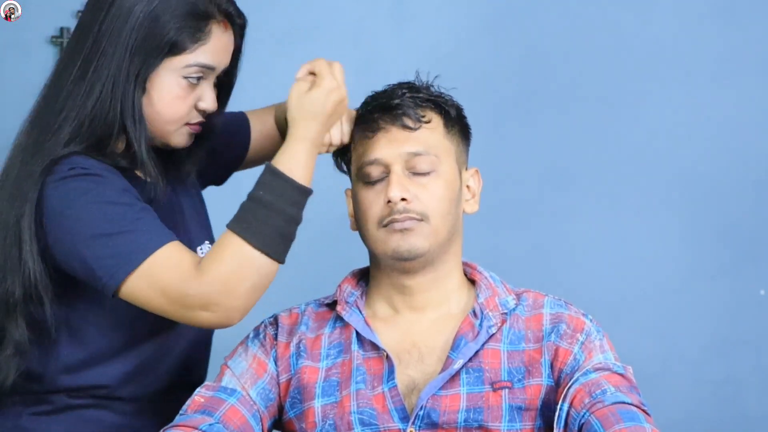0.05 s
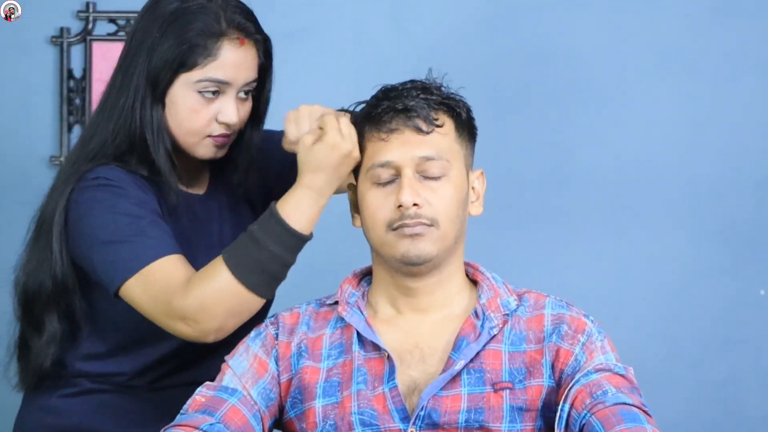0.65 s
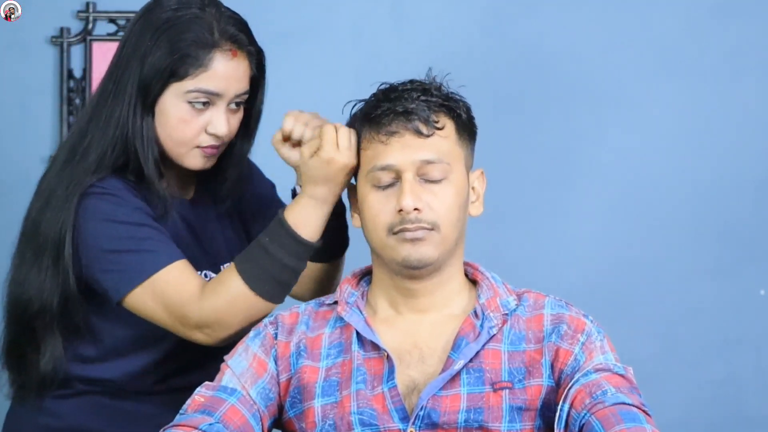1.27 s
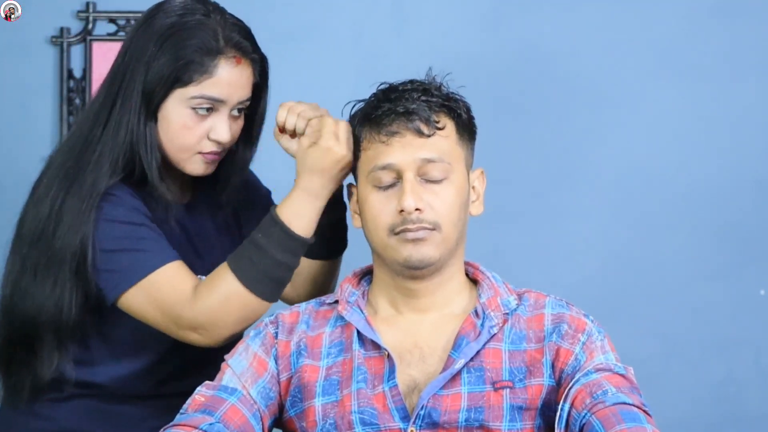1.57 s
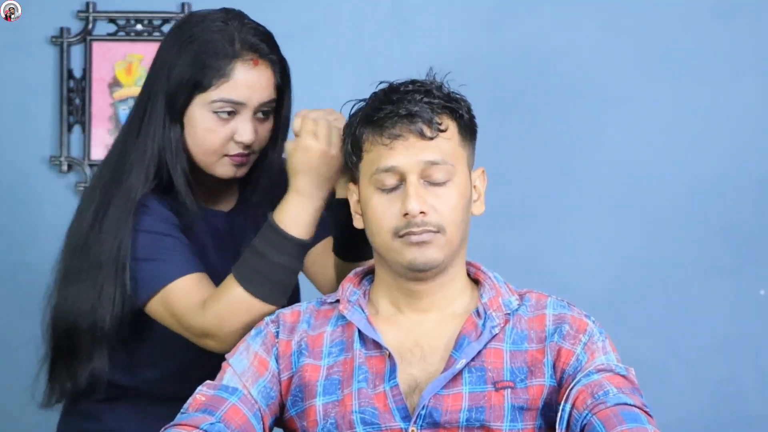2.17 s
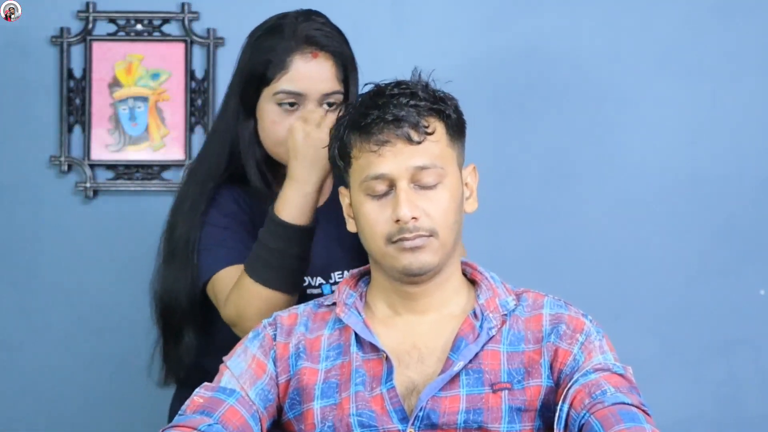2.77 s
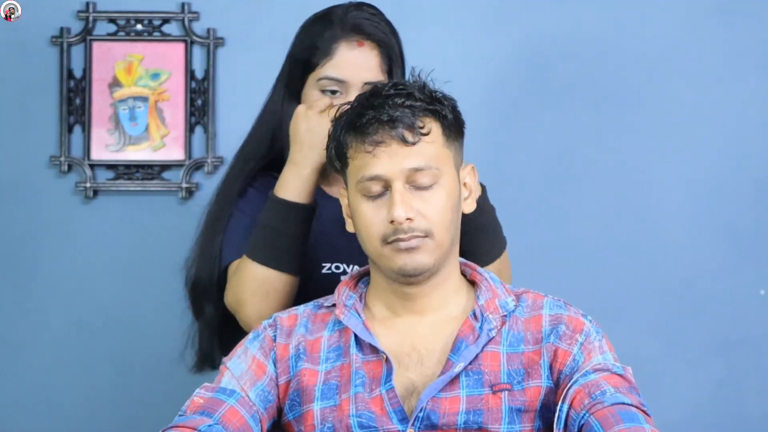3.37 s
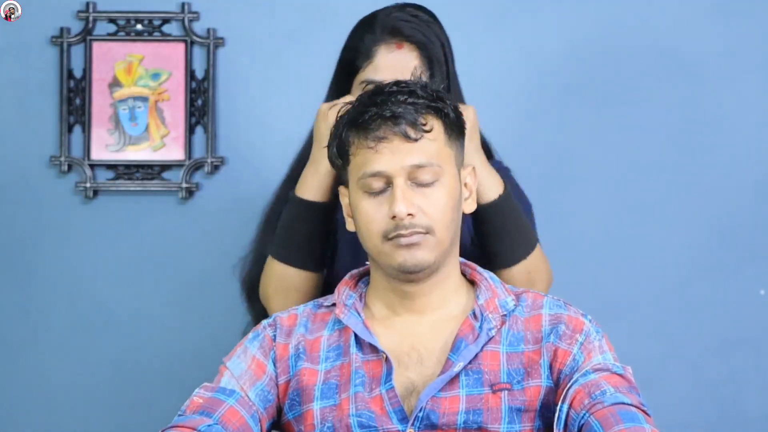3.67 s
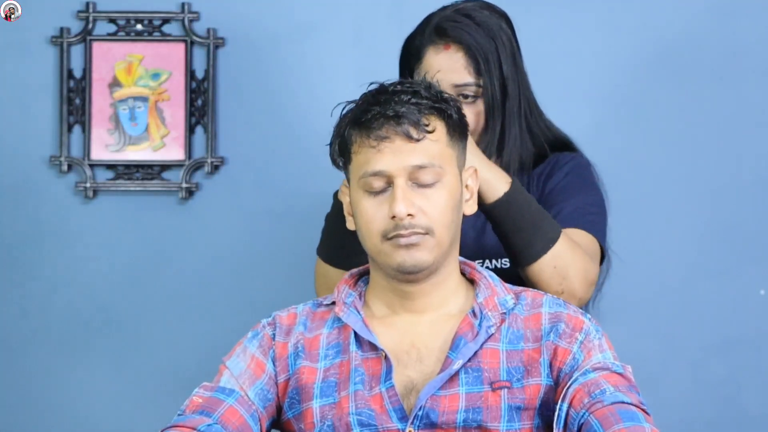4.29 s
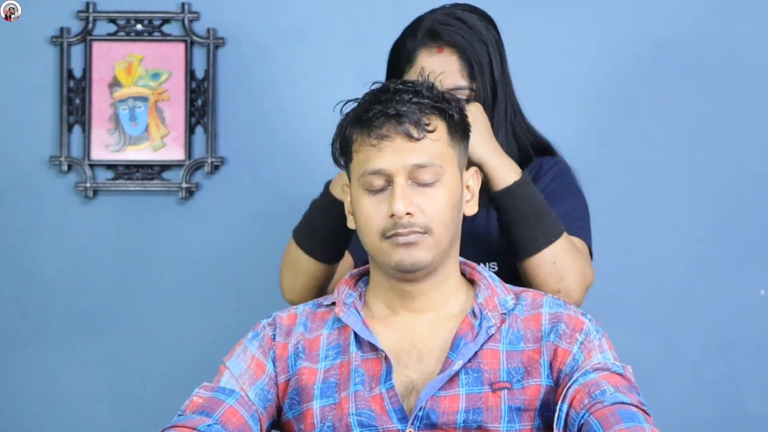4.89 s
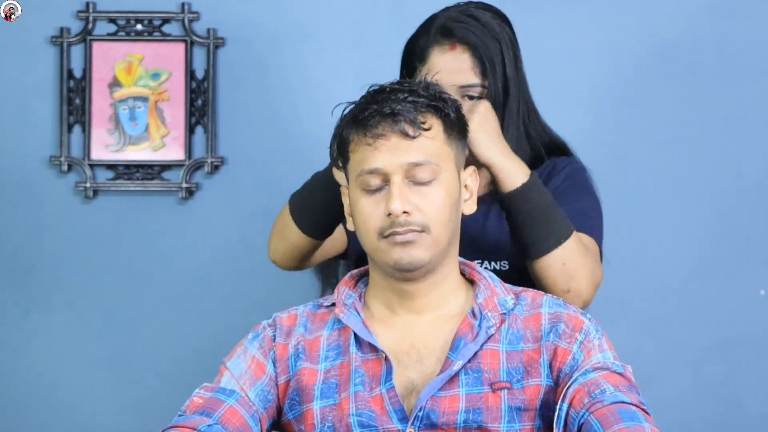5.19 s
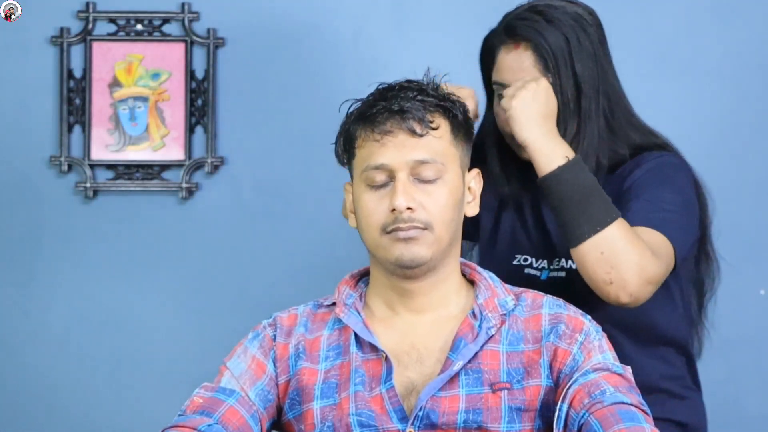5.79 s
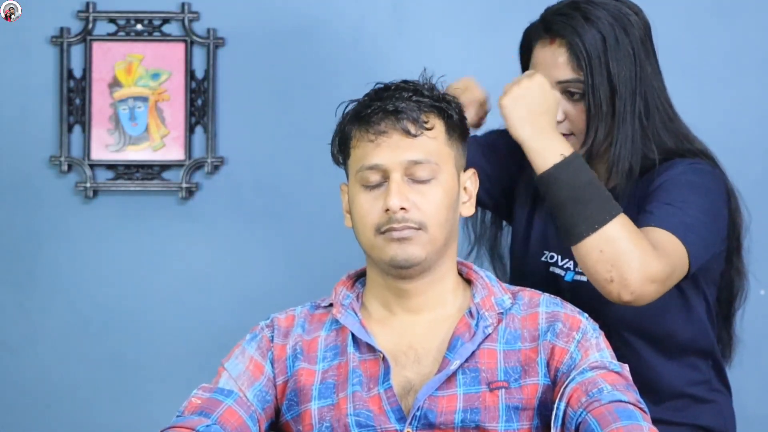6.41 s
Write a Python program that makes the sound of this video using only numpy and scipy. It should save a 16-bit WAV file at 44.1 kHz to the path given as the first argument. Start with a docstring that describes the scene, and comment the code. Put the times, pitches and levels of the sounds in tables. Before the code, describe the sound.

Locks of hair are twisted between two fists and tugged about three times a second, close to the microphones. Each tug gives a crisp, slightly creaky snap with a soft low thump from the scalp. Between tugs, fingers take a new grip with a thin rustle and tick. The snaps are loudest around the middle, then carry on more lightly. A small room hums faintly behind.

```python
"""Tugging locks of hair

Hair is twisted between two fists and tugged about three times a second, close to two microphones.
Each tug rubs strand on strand, lets go with a crisp snap and jolts the scalp with a soft thump.
Between tugs the fingers take a new grip with a thinner rustle. A small room hums quietly behind."""
import sys
import numpy as np
from scipy import signal
from scipy.fft import rfft, irfft
from scipy.io import wavfile
from scipy.ndimage import uniform_filter1d

SR = 44100
rng = np.random.default_rng(int(sys.argv[2]) if len(sys.argv) > 2 else 0)


def digitize_waveform(pressure):
    """Quantize a signal to 16-bit integers and store it at the path in sys.argv[1].

    Rows of a 2-D input are taken as channels; values are limited to [-1, 1].
    """
    field = np.atleast_2d(pressure).T
    bounded = np.clip(field, -1, 1)
    quanta = np.round(bounded * 32767).astype(np.int16)
    wavfile.write(sys.argv[1], SR, quanta)


N = 293265
SIZE, LEAD = 8192, 2048  # samples in one short sound, and how many come before its time zero
T = (np.arange(SIZE) - LEAD) / SR
HZ = np.fft.rfftfreq(SIZE, 1 / SR)


def amp(db):
    """Turns decibels into a gain."""
    return 10 ** (np.asarray(db) / 20)


def unit_rms(x):
    """Scales a signal to an average strength (rms) of 1."""
    return x / np.sqrt(np.mean(x ** 2) + 1e-20)


def curve(points, hz):
    """Joins the points of a table along a logarithmic pitch axis."""
    f, value = np.transpose(points)
    return np.interp(np.log(hz + 1e-6), np.log(f), value)


def colour(x, db):
    """Shapes the tone with a filter that rings after each click, never before."""
    phase = -signal.hilbert(np.log(amp(np.r_[db, db[-2:0:-1]]))).imag[:len(db)]
    return irfft(rfft(x) * amp(db) * np.exp(1j * phase))


def add(mix, s, sound):
    """Lays a sound into the mix with its time zero at s seconds."""
    start = round(s * SR) - LEAD
    sound = sound[:, max(-start, 0):]
    part = mix[:, max(start, 0):][:, :sound.shape[1]]
    part += sound[:, :part.shape[1]]


def place(x, late_ms, balance_db):
    """Makes the left side later and louder than the right; negative values do the opposite."""
    half = np.array([[.5], [-.5]])
    delay = half * late_ms / 1000
    return irfft(rfft(x) * np.exp(-2j * np.pi * HZ * delay)) * amp(half * balance_db)


def wander(count, size):
    """A smooth random curve that changes over about size steps."""
    return unit_rms(uniform_filter1d(uniform_filter1d(rng.standard_normal(count), size), size))


def swell(rise, fall, centre=0.):
    """Grows to a peak at centre, then dies away; times in seconds."""
    return np.exp(np.minimum((T - centre) / rise, (centre - T) / fall))


def grains(tone_db, per_s, spread_db, apart):
    """Tiny slips of uneven size; apart weights those that reach only one microphone."""
    sizes = amp(spread_db * np.minimum(rng.exponential(1, (3, SIZE)), 4))
    slips = sizes * rng.choice([-1, 1], (3, SIZE)) * (rng.random((3, SIZE)) < per_s / SR)
    slips *= amp(1.8 * wander(SIZE, size=170))  # strands catch and give in clumps
    hollows_db = 3 * wander(len(HZ), size=70)  # each grip forms hollows with their own tone
    fizz = unit_rms(colour(slips, tone_db + hollows_db))
    return unit_rms(fizz[0] + apart * fizz[1:])


def burst(tone_db, fall, span, early):
    """One sudden slip amid a rush of small ones, with the energy of span seconds at rms 1."""
    slips = rng.standard_normal(SIZE) * swell(rise=fall / 2, fall=fall, centre=fall / 2)
    click = unit_rms(colour(1. * (T == 0), tone_db))
    rush = unit_rms(colour(slips, tone_db))
    x = np.roll(click + .5 * rush, -round(early * SR))
    return x / np.linalg.norm(x) * np.sqrt(span * SR)


def low_cut(lowest_hz):
    """A tight lock gives off little sound below its lowest note: that loss in dB."""
    return -19.5 * np.clip((1.03 - HZ / lowest_hz) / 0.13, 0, 1)


# Tone of the room's hum: f/Hz, relative level/dB
HUM_TONE = [(20, -25.5), (50, -19), (100, -14), (160, 6.5), (215, -2.5), (270, 6), (315, -2.5), (400, -0.5),
            (600, -8), (900, -10.5), (1250, -10.5), (1600, -19.5), (2500, -23.5), (4500, -36),
            (9000, -41.5), (15000, -49)]
# How alike its two sides are: f/Hz, likeness (1 = the same)
HUM_LIKENESS = [(50, 0.91), (250, 1), (500, 0.83), (1200, 0.06), (4000, 0.066), (14000, .2)]
# Which way it leans: f/Hz, left minus right/dB
HUM_LEAN = [(60, 3), (130, 0.5), (290, -1.5), (640, -3), (1410, -4.5), (3100, -3.5), (6820, -2.5),
            (15000, -1)]


def hum(level_db=-55):
    """The room's low, airy background, drifting a little in level from pitch to pitch."""
    hz = np.fft.rfftfreq(2048, 1 / SR)
    a, b, c, d, drift = rng.standard_normal((N // 512 + 5, len(hz), 5)).T
    drift = unit_rms(uniform_filter1d(uniform_filter1d(drift, size=9, axis=0), size=14, axis=1))
    likeness = np.clip(curve(HUM_LIKENESS, hz), -1, 1)[:, None]
    left = a + 1j * b
    right = likeness * left + np.sqrt(1 - likeness ** 2) * (c + 1j * d)
    bands = np.array([left, right]) * amp(curve(HUM_TONE, hz)[:, None] + 1.5 * drift)
    bands *= amp(np.outer([.5, -.5], curve(HUM_LEAN, hz)))[:, :, None]
    return amp(level_db) * unit_rms(signal.istft(bands, nperseg=2048, noverlap=1536)[1][:, :N])


# Tone of a creaking lock: f/Hz, relative level/dB
CREAK_TONE = [(200, 11), (500, 2), (800, -6.5), (1400, -5.5), (2400, -9), (3200, -7.5), (4200, -7.5),
              (5500, -15.5), (12000, -38.5)]


def creak(snap_db, rub_db, lowest_hz):
    """The tight lock creaks: more with a harder snap, but only as far as friction allows."""
    tension = 1 / np.hypot(amp(-snap_db + 3.5), amp(-rub_db - 2.5))
    slips = grains(curve(CREAK_TONE, HZ) + low_cut(lowest_hz), per_s=2800, spread_db=1.5, apart=1)
    peak = swell(rise=.004, fall=.0068, centre=.00056)
    return tension * slips * (peak + amp(-13.5) * swell(rise=.024, fall=.04))


# Tone of hair sliding on hair: f/Hz, relative level/dB
RUB_TONE = [(200, -34.5), (1500, -26), (2600, -4), (3600, -13), (5000, 2), (7000, 2), (9500, -1.5),
            (12500, -1.5), (15000, -8.5)]


def friction(rub_db, rustle_db):
    """Strands rub hardest as the lock lets go, and a longer rustle trails off."""
    tone_db = curve(RUB_TONE, HZ)
    width = np.where(T < .001, .0045, .008)
    release = np.exp(-((T - .001) / width) ** 2)
    build_up = amp(-10.5) * swell(rise=.015, fall=.004, centre=.0014)
    rub = amp(rub_db - 2.5) * grains(tone_db, per_s=7000, spread_db=5, apart=.8)
    rustle = amp(rustle_db + 7.5) * grains(tone_db, per_s=4000, spread_db=4.5, apart=2)
    return rub * (release + build_up) + rustle * swell(rise=.011, fall=.025, centre=.0044)


# Tone of a snap: multiple of the snap's pitch, relative level/dB
SNAP_TONE = [(.1, -1), (.3, -15.5), (.5, -7), (.65, -12.5), (.85, 3.5), (1.22, -3.5), (1.5, 0),
             (1.85, -13.5), (3.2, -33.5), (5.5, -26)]


def snap(db, hz, lowest_hz):
    """The twisted lock lets go all at once."""
    tone_db = curve(SNAP_TONE, HZ / hz) + low_cut(lowest_hz)
    return amp(db) * burst(tone_db, fall=.0012, span=.0019, early=.0003)


# Tone of a tick: f/Hz, relative level/dB
TICK_TONE = [(300, -36), (2500, -25), (4500, -22), (6500, -5), (11000, 9.5), (15500, 2.5)]


def tick(db):
    """Single hairs give a dry, bright click."""
    return amp(db) * burst(curve(TICK_TONE, HZ), fall=.0006, span=.0018, early=.0002)


def stroke(snap_db, snap_hz, lowest_hz, tick_db, rub_db, rustle_db):
    """One pull on the hair: it snaps, ticks, creaks and rubs."""
    x = snap(snap_db, snap_hz, lowest_hz) + tick(tick_db)
    x = x + creak(snap_db, rub_db, lowest_hz) + friction(rub_db, rustle_db)
    return x * signal.windows.tukey(SIZE, .2)


def thump(db, hz):
    """The scalp is moved, springs back once and shudders to rest."""
    width = np.where(T < 0, .58, .68) / hz
    swing_hz = hz * np.where(T < 0, .96, .88)  # the swing slows as the skin relaxes
    push = np.cos(2 * np.pi * swing_hz * T) * np.exp(-(T / width) ** 2)
    flesh_db = curve([(25, -25), (70, 5), (140, 2.5), (220, -7), (400, -33), (900, -37), (3000, -71)], HZ)
    noise = unit_rms(colour(rng.standard_normal((3, SIZE)), flesh_db))
    shudder = unit_rms(noise[0] + .8 * noise[1:]) * swell(rise=.003, fall=.018, centre=.008)
    return place(amp(db + 5.5) * (push + amp(-9.5) * shudder), late_ms=.41, balance_db=.9)


def brush(db, hz, half_length_s):
    """Hair swishes past skin; the duller the swish, the narrower its range of pitches."""
    steepness = 17 * (10000 / hz) ** 2
    band_db = np.maximum(-steepness * np.log2(HZ / hz + 1e-6) ** 2, -38)
    fizz = grains(band_db, per_s=5000, spread_db=4.5, apart=1.2)
    fade = np.exp(-(T / half_length_s) ** 2 / 2) * signal.windows.tukey(SIZE, .3)
    return place(amp(db) * fizz * fade, late_ms=-.13, balance_db=1.2)


# Tugs on a twisted lock: t/s, snap level/dB, snap f/Hz, lowest note f/Hz,
# tick level/dB, rub level/dB, thump level/dB, thump f/Hz
HAIR_TUGS = [(0.0537, -33, 3240, 2390, -58, -38.5, -30.5, 118),
             (0.4235, -24, 3370, 2050, -40, -35, -30, 142),
             (0.7631, -28, 3500, 2290, -39.5, -36.5, -30.5, 122),
             (1.0927, -33, 2800, 1570, -57, -40, -35, 112),
             (1.4002, -36.5, 3400, 1120, -54, -36.5, -39, 137),
             (1.7507, -31.5, 2960, 2110, -62, -42, -53, 104),
             (2.0557, -24, 2890, 1740, -51, -37, -35.5, 109), (2.3668, -25, 2670, 2060, -44, -41, -35, 97),
             (2.6758, -29.5, 2900, 1940, -47, -36.5, -36.5, 88),
             (2.9898, -16.5, 2380, 1370, -57, -31.5, -32, 173),
             (3.3328, -10, 2620, 1280, -52.5, -33, -33, 110),
             (3.6581, -15.5, 2750, 1450, -39.5, -31, -28, 149.3),
             (3.9938, -25.5, 3470, 2010, -53.5, -35.5, -30.5, 111.5),
             (4.3176, -27, 3570, 2130, -52, -36.5, -32, 106),
             (4.6428, -30.5, 3430, 2630, -57, -34.5, -32, 175.6),
             (4.9725, -33, 3170, 2800, -59, -41.5, -35.5, 77),
             (5.3219, -19.5, 3480, 1940, -41, -32.5, -25, 161.3),
             (5.6264, -31, 4360, 2160, -29, -25.5, -26, 111.7),
             (5.9505, -29.5, 3550, 2440, -56, -37.5, -26, 97.3),
             (6.2716, -32, 3500, 2940, -39, -33, -27, 117),
             (6.5955, -28.5, 3750, 2090, -59.5, -37.5, -24, 111.4)]


def tugs(hair, scalp):
    """The lock cracks and slides out of the fist; the scalp follows 0.6 of a swing after the snap."""
    for s, snap_db, snap_hz, lowest_hz, tick_db, rub_db, thump_db, thump_hz in HAIR_TUGS:
        pull = stroke(snap_db, snap_hz, lowest_hz, tick_db, rub_db, rustle_db=-55.5)
        add(hair, s, place(pull, late_ms=.094, balance_db=-1.5))
        add(hair, s + .05, brush(db=-63, hz=9200, half_length_s=.013))
        add(scalp, s + .6 / thump_hz, thump(thump_db, thump_hz))


# New grips: t/s, tick level/dB, rub level/dB, rustle level/dB, thump level/dB, left minus right/dB
FINGER_GRIPS = [(0.1946, -42.5, -62, -55, -47, 16.5), (0.4967, -44, -48, -58, -67, 7.5),
                (0.8559, -38, -54, -53.5, -48, 3.5), (1.138, -58, -60, -56, -44, -1),
                (1.288, -43, -48.5, -61.5, -54, 2.5), (1.571, -40.5, -53.5, -71, -50.5, 7.5),
                (1.8539, -30, -69, -53.5, -43, -3.5), (2.1487, -39, -45.5, -56, -40, 0),
                (2.449, -50, -41, -57.5, -28.5, 7), (2.814, -43, -49.5, -58.5, -34, 5.5),
                (3.1526, -31, -42.5, -47.5, -25, 0), (3.487, -58, -47, -56.5, -31.5, 7.5),
                (3.834, -44.5, -39.5, -50, -43, 3), (4.1765, -57.5, -41, -53, -36.5, 5.5),
                (4.4691, -41.5, -45.5, -58.5, -34.5, 2), (4.8225, -42.5, -42, -60, -36, 6.5),
                (5.1872, -38, -39, -53.5, -45.5, 7), (5.5625, -50.5, -34.5, -52.5, -43.5, 0.5),
                (6.0303, -48, -35.5, -50.5, -39.5, 0.5), (6.4022, -49, -37, -51, -41.5, 1.5)]


def grips(hair, scalp):
    """Fingertips brush in, close on slack hair with a thin snap and press the scalp."""
    for s, tick_db, rub_db, rustle_db, thump_db, balance_db in FINGER_GRIPS:
        add(hair, s - .018, brush(db=-63.5, hz=10430, half_length_s=.012))
        grab = stroke(snap_db=rub_db - 11, snap_hz=3820, lowest_hz=3560,
                      tick_db=tick_db, rub_db=rub_db, rustle_db=rustle_db)
        add(hair, s, place(grab, late_ms=-.13, balance_db=balance_db))
        add(scalp, s + .002, thump(thump_db, hz=106))


# Faint, distant whistles: start t/s, end t/s, first f/Hz, last f/Hz, level/dB
FAR_WHISTLES = [(0.298, 0.845, 1265, 1167, -69.5), (0.252, 0.77, 1800, 1766, -76.5),
                (1.268, 1.668, 1834, 1785, -69), (1.579, 1.81, 1209, 1100, -59),
                (2.054, 2.497, 1214, 1199, -67.5), (4.353, 5.012, 1450, 1427, -72.5)]


def whistles(width_hz=48):
    """Thin bands of noise, a little to the right, that sink slowly in pitch."""
    out = np.zeros((2, N))
    smoothing = np.exp(-np.pi * width_hz / SR)
    for start, end, first_hz, last_hz, db in FAR_WHISTLES:
        count = round((end - start) * SR)
        flutter = signal.lfilter([1], [1, -smoothing], rng.standard_normal((2, SR)))[:, :count]
        phase = 2 * np.pi * np.cumsum(np.linspace(first_hz, last_hz, count)) / SR
        tone = unit_rms(flutter[0] * np.cos(phase) + flutter[1] * np.sin(phase))
        tone *= amp(db) * signal.windows.tukey(count, .7)
        add(out, start + LEAD / SR, tone * amp([[-3], [2]]))
    return out


# Brief ringing notes: t/s, level/dB, f/Hz
RINGING_NOTES = [(0.4183, -37.5, 515), (0.4223, -30, 2680), (1.091, -27, 2750), (1.0925, -41, 1670),
                 (2.3666, -28, 2560), (2.9875, -37.5, 963), (2.9882, -40.5, 400), (3.3319, -16, 3494),
                 (3.481, -35, 2890), (3.9886, -39.5, 392), (4.1745, -32, 2980), (4.3166, -23.5, 3024),
                 (4.6433, -31.5, 3000), (4.8236, -39, 2670), (4.974, -30.5, 3030), (5.1835, -28.5, 2535),
                 (5.947, -35, 387), (6.27, -25, 3510), (6.398, -42, 2690), (6.594, -20.5, 4110)]


def rings(hair):
    """The tightest strands ring, and so does the hollow of the fist (the lower, longer notes)."""
    t = np.maximum(T, 0)
    for s, db, hz in RINGING_NOTES:
        fall_s = .0047 * (2800 / hz) ** .23
        fade = (1 - np.exp(-t / .0013)) * np.exp(-t / fall_s)
        note = amp(db + 4.5) * np.sin(2 * np.pi * hz * t) * fade
        add(hair, s, place(note, late_ms=.11, balance_db=-1))


# Second thumps: t/s, level/dB, f/Hz
AFTER_THUMPS = [(0.453, -37.5, 121), (0.8065, -44, 115), (2.1873, -44.5, 99), (2.4752, -33, 117),
                (2.5027, -40, 146), (2.8517, -32.5, 157), (3.187, -27.5, 136), (4.29, -46.5, 175),
                (5.402, -45.5, 243), (5.9773, -39, 117)]


def after_thumps(scalp):
    """A second soft, low thump, mostly just after a tug or grip."""
    for s, db, hz in AFTER_THUMPS:
        add(scalp, s, thump(db, hz))


# Stray hairs: t/s, level/dB, centre f/Hz, half length/s
STRAY_HAIRS = [(1.854, -29.5, 11900, 0.0019), (1.898, -47.5, 12300, 0.006), (2.158, -46, 7400, 0.0026),
               (3.068, -61.5, 8510, .04), (3.566, -70, 4210, 0.049), (4.205, -43, 12900, 0.0037),
               (5.208, -44.5, 13500, .008), (5.319, -26.5, 6160, .0012), (5.435, -64.5, 4740, 0.041),
               (6.017, -44.5, 8900, .0043), (6.424, -41, 10260, 0.0064)]


def flicks(hair):
    """Stray hairs flick or brush past a fingertip."""
    for s, db, hz, half_length_s in STRAY_HAIRS:
        add(hair, s, brush(db, hz, half_length_s))


# How long the echo takes to fade by 60 dB: f/Hz, t/s
ECHO_FADE = [(100, 0.083), (400, 0.41), (1500, 0.26), (3000, 0.34), (6000, 0.25), (14000, 0.3)]
# Tone of the echo: f/Hz, relative level/dB
ECHO_TONE = [(80, -5), (400, 7.5), (1300, 6), (2600, -2), (4200, -5.5), (7000, 1.5), (14000, -7)]


def room_echo(x, bounces=1500, gap_samples=20, first_s=.0036):
    """Sound bounces off near walls, each pitch dying away at its own speed."""
    arrivals = np.arange(bounces) * gap_samples + rng.integers(0, gap_samples, (2, bounces))
    echoes = np.zeros((2, SR))
    np.put_along_axis(echoes, arrivals + round(first_s * SR), rng.choice([-1., 1.], arrivals.shape), 1)
    hz, t, bands = signal.stft(echoes, SR, nperseg=256)
    fade = amp(-60 * t / curve(ECHO_FADE, hz)[:, None])
    tail = signal.istft(bands * fade * amp(curve(ECHO_TONE, hz))[:, None], SR)[1]
    return signal.fftconvolve(x, tail / np.linalg.norm(tail[0]), axes=1)[:, :N]


def scene():
    """Hair and scalp close by, with the room behind them."""
    hair, scalp = np.zeros((2, 2, N))
    tugs(hair, scalp)
    grips(hair, scalp)
    rings(hair)
    flicks(hair)
    after_thumps(scalp)
    echo = room_echo(amp(-18.5) * hair + amp(-27.5) * scalp)
    return hair + scalp + echo + hum() + whistles()


def record(dry, low_hz=36, high_hz=15500):
    """Filters drop the deepest rumble and the highest treble."""
    rumble_cut = signal.butter(2, low_hz, "high", fs=SR, output="sos")
    treble_cut = signal.firwin(255, high_hz, window=("kaiser", 8), fs=SR)
    return signal.oaconvolve(signal.sosfiltfilt(rumble_cut, dry), treble_cut[None], "same")


dry = scene()
out = record(dry)
digitize_waveform(out)
```